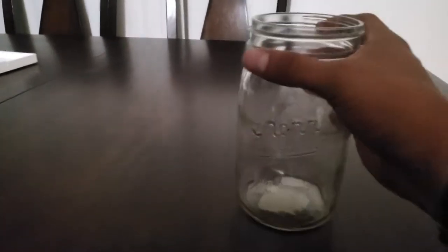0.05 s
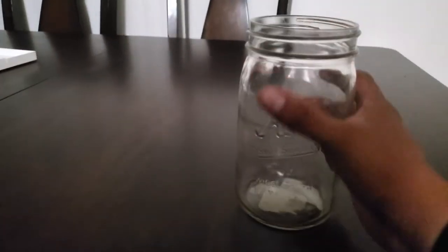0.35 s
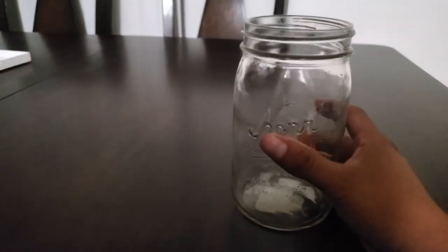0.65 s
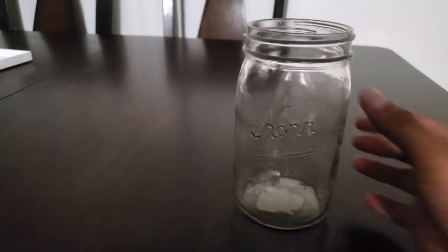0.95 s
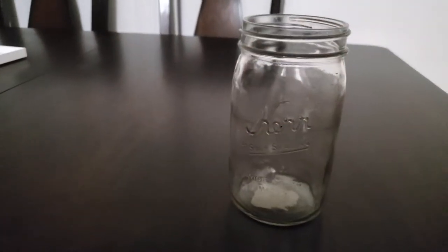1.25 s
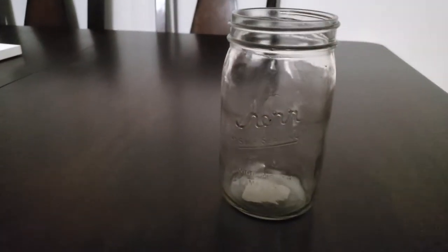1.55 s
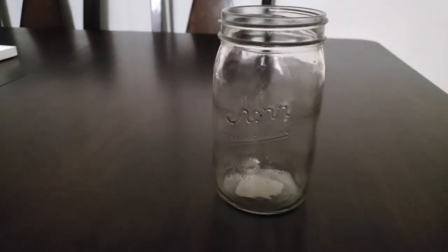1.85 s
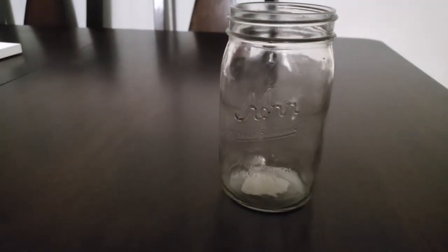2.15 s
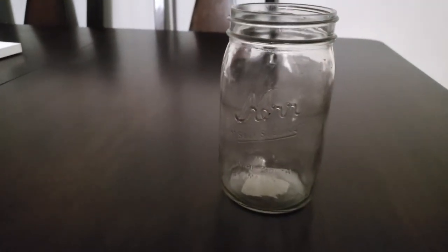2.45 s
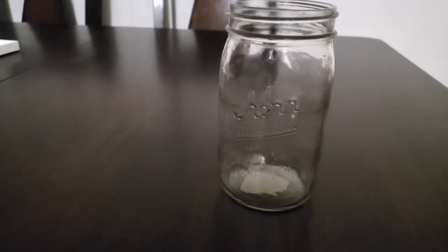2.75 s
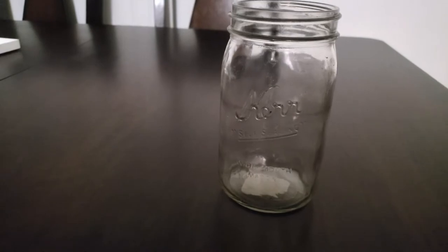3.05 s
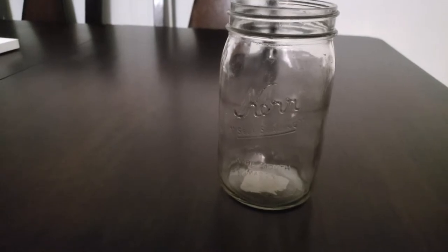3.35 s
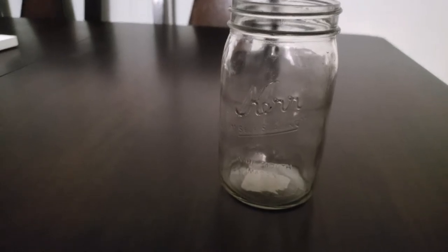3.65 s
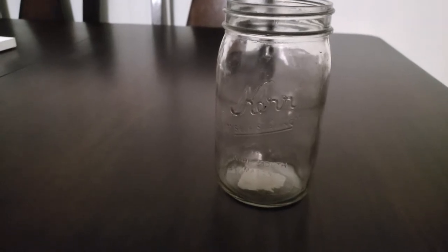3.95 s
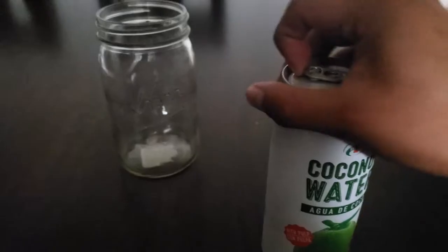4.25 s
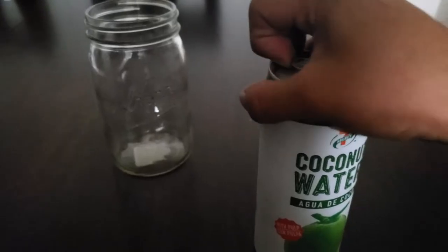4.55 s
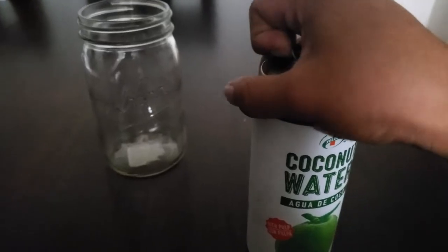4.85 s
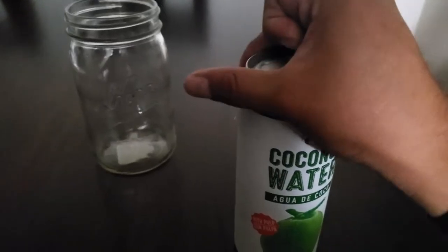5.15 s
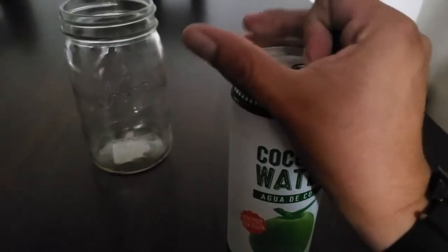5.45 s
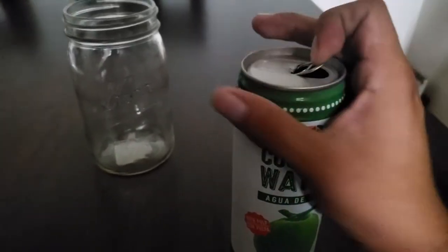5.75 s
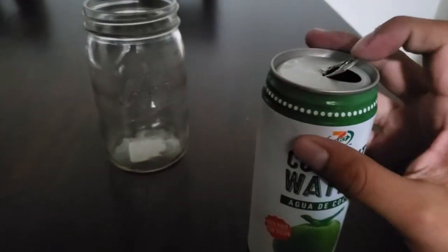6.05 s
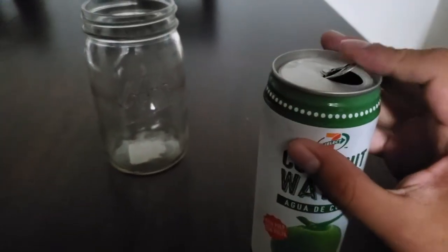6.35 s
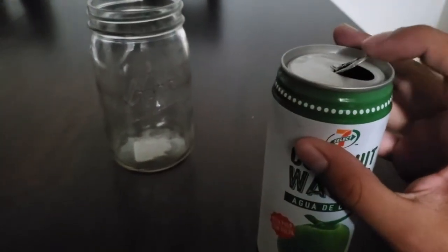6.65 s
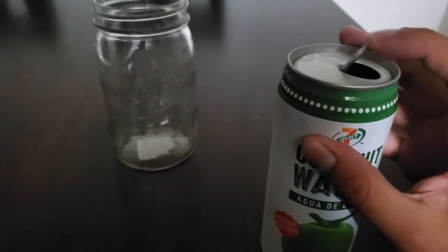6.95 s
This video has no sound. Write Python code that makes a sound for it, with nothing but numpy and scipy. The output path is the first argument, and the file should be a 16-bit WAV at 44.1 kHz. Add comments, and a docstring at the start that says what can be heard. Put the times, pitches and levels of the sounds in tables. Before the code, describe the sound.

An empty glass jar is set on a wooden table with two knocks, followed by a light clink as the hand lets go. For a few seconds there is only a faint fridge hum. Then a drink can is opened: a click, a short puff of gas, a loud crack and two sharp metallic snaps. Fingers softly scrape the tab. It all sounds close, in a room with a short echo.

```python
"""Over a faint fridge hum and a soft background rush, an empty glass jar knocks twice on a wooden table.
Skin brushes the glass and the jar clinks as the hand lets go. After a short silence a drink can is opened:
the tab clicks, gas puffs through the seal, the lid tears and snaps in, and the tab springs free.
Then fingers fiddle with the tab and the can rocks on the table. Each blow is a click and a tiny scrape
that make an object ring, and the hard walls of the room send it back."""
import sys
import numpy as np
from scipy import signal
from scipy.fft import rfft, irfft
from scipy.io import wavfile
from scipy.ndimage import uniform_filter1d, minimum_filter1d

SR = 44100
rng = np.random.default_rng(int(sys.argv[2]) if len(sys.argv) > 2 else 0)


def file_out(sig):
    """Save sig as 16-bit WAV at sys.argv[1]."""
    # one column per channel
    cols = np.atleast_2d(sig).T
    # limit, then scale
    lim = np.clip(cols, -1, 1)
    pcm = np.round(lim * 32767).astype(np.int16)
    wavfile.write(sys.argv[1], SR, pcm)


N = 313110
TIME = np.arange(N) / SR
FREQS = np.arange(N // 2 + 1) * SR / N


def undb(db):
    """Turns decibels into a gain to multiply by."""
    return 10 ** (np.asarray(db) / 20)

def over_pitch(rows, hz):
    """Joins rows of (frequency, value) into a curve, with every octave equally wide."""
    points, values = np.transpose(rows)
    return np.interp(np.log(hz + 1), np.log(points), values)

def unit(x):
    """Scales to an energy of one."""
    return x / np.sqrt(np.sum(x ** 2))

def add(track, s, x):
    """Mixes x into the track from time s."""
    start = int(s * SR)
    track[start:start + len(x)] += x[:N - start]

def ramp(start_s, length_s):
    """Rises evenly from zero to one."""
    return np.clip((TIME - start_s) / length_s, 0, 1)

def shortest_click(db):
    """The shortest sound that has these levels at evenly spaced frequencies."""
    cepstrum = irfft(db * np.log(10) / 20)
    half = len(cepstrum) // 2
    # folding onto the first half packs the energy at the start
    cepstrum[1:half] *= 2
    cepstrum[half + 1:] = 0
    return irfft(np.exp(rfft(cepstrum)))

def noise(gain):
    """Noise of strength one, shaped by a gain for each frequency."""
    return unit(irfft(gain * rfft(rng.standard_normal(N)), N)) * np.sqrt(N)

def waver(rate_hz):
    """Smooth random wandering with a spread of one."""
    return noise(1 / (1 + (FREQS / rate_hz) ** 4))

def noise_all_around(gain, mic_spacing_m=0.14):
    """Noise from all sides: long waves reach both microphones alike."""
    alike = np.sinc(2 * FREQS * mic_spacing_m / 343) * .95
    mid = irfft(gain * np.sqrt(1 + alike) * rfft(rng.standard_normal(N)), N)
    side = irfft(gain * np.sqrt(1 - alike) * rfft(rng.standard_normal(N)), N)
    return unit(np.array([mid + side, mid - side])) * np.sqrt(2 * N)

def place(x, lag_s, pan_db):
    """A sound from one direction: the left side gets it lag_s later and pan_db louder."""
    left = irfft(rfft(x) * np.exp(-2j * np.pi * FREQS * lag_s), N)
    return np.array([left * undb(pan_db / 2), x * undb(-pan_db / 2)])

# How long the room rings; a ring time is the time to fade by 60 dB (frequency [Hz], ring time [s])
ROOM_RING = [(100, 0.92), (300, 0.26), (800, 0.36), (2500, 0.39), (6000, 0.35), (14000, 0.3)]
# Echoes off the nearest walls (delay [s], gain [ratio], extra delay on the left [s])
WALL_ECHOES = [(0.012, 0.12, 0.01), (0.019, 0.09, -0.0079), (0.041, 0.081, 0.017)]
def room(x, build_s=0.0014):
    """Hard walls return a few distinct echoes and a smooth tail whose bass lasts longest."""
    wash = noise_all_around(np.ones(len(FREQS)))[:, :SR]
    hz, t, cells = signal.stft(wash, SR, nperseg=256)
    ring_s = over_pitch(ROOM_RING, hz)[:, None]
    tail = signal.istft(cells * np.exp(-np.log(1000) * t / ring_s), SR)[1][:, :SR]
    build_up = 1 - np.exp(-(TIME[:SR] / build_s) ** 2)
    tail = unit(tail * build_up) * np.sqrt(2)
    for delay, gain, lag in WALL_ECHOES:
        tail[0, int((delay + lag) * SR)] += gain
        tail[1, int(delay * SR)] += gain
    return signal.fftconvolve(x[None], tail, axes=1)[:, :N]

def body(colour, notes, size=32768):
    """An object's answer to a click: ringing notes stand above a quickly fading thud or tick."""
    hz = np.arange(size // 2 + 1) * SR / size
    # the longer a note rings, the narrower its peak
    peaks = sum(undb(db) ** 2 / (1 + ((hz - pitch) * 2 * np.pi * ring_s / np.log(1000)) ** 2)
                for pitch, db, ring_s in notes)
    return shortest_click(over_pitch(colour, hz) + 10 * np.log10(1 + peaks))

def strike(blows, response, lag_s, pan_db, size=4096):
    """Each blow is a click plus a scrape of tiny slips; it rings the object, which rings the room."""
    hz = np.arange(size // 2 + 1) * SR / size
    direct, to_room = np.zeros(N), np.zeros(N)
    for s, db, scrape_s, scrape_db, brightness, room_db in blows:
        slips = rng.standard_normal(size) * rng.exponential(size=size)
        force = undb(scrape_db) * unit(slips * np.exp(-(TIME[:size] / scrape_s) ** 4))
        force[0] += 1  # the click
        contact = shortest_click(brightness * np.log2(np.hypot(hz, 300)))  # harder is brighter
        sound = signal.fftconvolve(signal.fftconvolve(force, contact), response)
        sound = -undb(db) * unit(sound) * np.sqrt(SR / 100)  # level as if spread over 10 ms
        add(direct, s, sound)
        add(to_room, s, sound * undb(room_db))
    return place(direct, lag_s, pan_db) + room(to_room)


# The compressor's tones (multiple of its turning speed [number], relative level [dB])
HUM_TONES = [(1, -72.5), (2, -67), (3, -67), (4, -81.5), (5, -77), (6, -69.5), (7, -82), (8, -77),
             (10, -69), (11, -80.5), (12, -83.5), (41, -82)]
# The casing's whine (pitch [Hz], half width [Hz], relative level [dB])
CASING_WHINE = [(2432, 270, -85.5), (2584, 83, -79.5), (2870, 59.06, -83.5), (3757, 109, -84),
                (4050, 430, -82), (5040, 200, -88)]
# The fridge before and after the phone moves (hum [dB], whine [dB], left over right [dB], left delay [s])
FRIDGE_SPOTS = [(2.03, 1, -3.5, .00035), (0.41, -2, -3, .00025)]
def fridge(turns_hz=58.66, drift=0.00027, waver_db=3, wander_db=0.4, move_s=4.2):
    """The compressor hums and the casing whines; both are fainter once the phone has moved."""
    turns = np.cumsum(turns_hz * (1 + drift * waver(1.3))) / SR
    hum = 0
    for multiple, db in HUM_TONES:
        swell = undb(db + waver_db * waver(0.91) / np.hypot(1, multiple / 5))  # low tones waver most
        hum = hum + swell * np.sqrt(2) * np.sin(2 * np.pi * (round(multiple) * turns + rng.random()))
    whine = sum(undb(db) * noise_all_around(1 / (1 + ((FREQS - hz) / width) ** 2))
                for hz, width, db in CASING_WHINE)
    before, after = (undb(hum_db) * place(hum, lag_s, pan_db) + undb(whine_db) * whine
                     for hum_db, whine_db, pan_db, lag_s in FRIDGE_SPOTS)
    return np.where(TIME < move_s, before, after) * undb(wander_db * waver(.8))

# Tone colour of the background: a dull rush and a faint, high hiss (frequency [Hz], relative level [dB])
BACKGROUND_COLOUR = [(25, -2.5), (55, 3), (90, -5.5), (180, -0.5), (300, -7.5), (500, -11.5), (720, -13),
                     (950, -26.5), (1600, -24.5), (2000, -29.5), (4500, -31), (7000, -42), (10000, -41),
                     (15000, -33.5)]
def background(level_db=-62, waver_db=.4, pan_db=-1.5):
    """The dull, nearly steady rush of the room, with a faint, high hiss on top."""
    swell = undb(level_db + waver_db * waver(1.5))
    rush = noise_all_around(undb(over_pitch(BACKGROUND_COLOUR, FREQS))) * swell
    return rush * undb(np.array([[pan_db], [-pan_db]]) / 2)

# Two knocks of the jar, then three soft ones of the can
# (time [s], level [dB], scrape length [s], scrape over click [dB], brightness [dB/octave], echo [dB])
KNOCKS = [(.0612, -10, 0.036, -11.5, 1.5, 2), (.2595, -19, 0.007, 2, 1.5, 1.5),
          (4.28, -42.5, 0.029, 2, 0, -3.5), (4.883, -42.5, .008, -2, -7, 6),
          (6.301, -41.5, .016, -2, -5, 3.5)]
# Tone colour of the wood's thud (frequency [Hz], relative level [dB])
WOOD_COLOUR = [(35, -31.5), (75, -12), (150, -9), (250, -2.5), (400, 0), (650, -6.5), (1000, -11),
               (1400, -20.5), (2200, -25.5), (4000, -40), (7000, -55), (11000, -56), (16000, -72.5)]
# The table's ringing notes (pitch [Hz], height above the colour [dB], ring time [s])
WOOD_NOTES = [(70.95, 10.5, 0.3), (122.3, 9, 0.23), (185.6, 10.5, 0.21), (237.6, 3, 0.6), (289, 11.5, 0.23),
              (389, 6.5, 0.29), (422, 6, 0.17), (467, 3.5, 0.1), (518.7, 1.5, 0.14), (614, 6.5, 0.22),
              (817.7, 6, 0.18), (1029, 4.5, .2)]
def table_knocks():
    """The wooden table top booms under the jar and the can."""
    return strike(KNOCKS, body(WOOD_COLOUR, WOOD_NOTES), lag_s=.00013, pan_db=0.74)

# Swishes of the hand (time of the peak [s], level [dB])
SWISHES = [(.49, -67), (.89, -75), (1.96, -74), (4.55, -72), (5.75, -76)]
# Tone colour of sliding skin (frequency [Hz], relative level [dB])
SKIN_COLOUR = [(500, -10), (2000, -3), (4500, -2), (8000, -8), (15000, -13)]
def hand_swishes(half_length_s=0.076):
    """Skin brushes glass and metal; each faint swish swells and fades at the same pace."""
    swell = sum(undb(db) * np.exp(-((TIME - s) / half_length_s) ** 2) for s, db in SWISHES)
    return swell * noise_all_around(undb(over_pitch(SKIN_COLOUR, FREQS)))

# The touch as the hand lets go
# (time [s], level [dB], scrape length [s], scrape over click [dB], brightness [dB/octave], echo [dB])
CLINKS = [(.5291, -33, 0.0055, 3.4, 0.062, 1.13)]
# Tone colour of the glass's tick (frequency [Hz], relative level [dB])
GLASS_COLOUR = [(200, -15), (1200, -13), (2000, -3), (2800, 0), (3800, -9), (5200, -11), (6400, -20),
                (8800, -35), (10300, -24), (16000, -29)]
# The jar's ringing notes (pitch [Hz], height above the colour [dB], ring time [s])
GLASS_NOTES = [(2552, 3, .06), (2790, 3, .06), (3176, 5, .06), (4194, 3, .06), (5216, 3, .04),
               (10300, 6, .01)]
def jar_clink():
    """The glass wall gives one short, bright ring."""
    return strike(CLINKS, body(GLASS_COLOUR, GLASS_NOTES), lag_s=.00025, pan_db=1.6)

# The tab clicks, the seal cracks, the lid tears
# (time [s], level [dB], scrape length [s], scrape over click [dB], brightness [dB/octave], echo [dB])
CRACKS = [(4.504, -63, 0.0022, 5, 1.29, 3), (4.7192, -27, 0.0027, -2, 2.4, -4),
          (4.9942, -9, 0.0032, 5, 0.75, -1)]
# Tone colour of the lid's metal (frequency [Hz], relative level [dB])
LID_COLOUR = [(100, -14.5), (700, -10.5), (1200, -5.5), (1800, -1.5), (2600, 0.5), (4800, 0.5), (7000, -3),
              (9500, -5.5), (16000, -14)]
# The tight lid's ringing notes (pitch [Hz], height above the colour [dB], ring time [s])
LID_NOTES = [(1760, 9.2, .012), (2830, 9.3, 0.023), (3880, 8.9, 0.031), (3950, 10.42, 0.022),
             (4240, 13, 0.024), (6420, 7.3, 0.022), (7326, 8, 0.022)]
def lid_cracks():
    """The tight lid gives high cracks as the tab is lifted."""
    return strike(CRACKS, body(LID_COLOUR, LID_NOTES), lag_s=0.00014, pan_db=1.5)

# Tone colour of the escaping gas (frequency [Hz], relative level [dB])
GAS_COLOUR = [(100, -9.5), (800, -20), (1200, -10.5), (1800, 6), (2800, -6), (4000, -2), (5200, -9.5),
              (7000, -2.5), (9000, -7.5), (11500, -1), (16000, -7)]
def gas_puff(time_s=4.7578, level_db=-24, rise_s=.003, hold_s=.0115, fade_s=.035):
    """Gas sputters through the cracked seal, holds while the pressure lasts, then dies away."""
    sputter_db, room_db = 2, -4
    fading_for_s = np.maximum(TIME - time_s - hold_s, 0)
    flow = ramp(time_s - rise_s, rise_s) ** 2 * np.exp(-np.log(1000) * fading_for_s / fade_s)
    hiss = noise(undb(over_pitch(GAS_COLOUR, FREQS)))
    puff = hiss * undb(level_db + sputter_db * waver(600)) * flow
    return place(puff, lag_s=.00016, pan_db=.8) + undb(room_db) * room(puff)

# The lid snaps in
# (time [s], level [dB], scrape length [s], scrape over click [dB], brightness [dB/octave], echo [dB])
SNAPS = [(5.1006, -13, .001, -1, -.6, 1.5)]
# Tone colour of the open can (frequency [Hz], relative level [dB])
CAN_COLOUR = [(100, -5), (550, -6), (900, 2), (1500, -2), (2300, 8.5), (3300, -12.5), (6000, 1),
              (9000, -3.5), (11500, -2.5), (16000, -15)]
# The open can's ringing notes (pitch [Hz], height above the colour [dB], ring time [s])
CAN_NOTES = [(915, 15, .03), (1025, 11, .03), (2200, 7, .02), (2430, 10, .04), (3930, 8, .03),
             (6600, 6, .015), (8650, 7, .008)]
def lid_snap():
    """With the lid torn open, the hollow under it rings too."""
    return strike(SNAPS, body(CAN_COLOUR, CAN_NOTES), lag_s=0.00011, pan_db=-1.5)

# The tab's flick
# (time [s], level [dB], scrape length [s], scrape over click [dB], brightness [dB/octave], echo [dB])
FLICKS = [(5.1283, -12, .002, -1, 1, -3.5)]
# The flick's ringing notes (pitch [Hz], height above the colour [dB], ring time [s])
FLICK_NOTES = [(1008, 18.5, 0.012), (2355, 13, 0.017), (5880, 10.8, .008), (8760, 6, 0.0051)]
def tab_spring():
    """The tab springs free and rings briefly, with the tone colour of the lid."""
    return strike(FLICKS, body(LID_COLOUR, FLICK_NOTES), lag_s=.000136, pan_db=1)

# Fingers on the tab (time [s], level [dB], scrape length [s], brightness [dB/octave])
FINGER_TOUCHES = [(5.445, -62.5, .01, 1), (5.815, -63.5, .012, 4.5), (5.985, -64, 0.039, -4),
                  (6.09, -68, .03, -2), (6.19, -59, 0.036, 1.5), (6.276, -40.5, 0.018, -1.5),
                  (6.441, -53, .015, -2.5)]
# Tone colour of the scraped tab (frequency [Hz], relative level [dB])
TAB_COLOUR = [(100, -19), (700, -19), (1200, 0), (1900, -21), (3100, -11), (4200, -22), (5300, -22),
              (8000, -35), (16000, -50)]
# The tab's ringing notes (pitch [Hz], height above the colour [dB], ring time [s])
TAB_NOTES = [(1114, 12, 0.042), (1288, 11.6, 0.053), (2970, 2.5, 0.041)]
def tab_fiddling(as_strong_as_click_s=.003, room_db=-3):
    """Fingers scrape the tab: the longer one slides, the more its tiny slips outweigh the click."""
    scrapes = [(s, db, length_s, 10 * np.log10(length_s / as_strong_as_click_s), brightness, room_db)
               for s, db, length_s, brightness in FINGER_TOUCHES]
    return strike(scrapes, body(TAB_COLOUR, TAB_NOTES), lag_s=.00018, pan_db=-2.0)


def scene():
    """Jar, can and hand over the fridge and the background."""
    table_and_jar = table_knocks() + jar_clink()
    can = lid_cracks() + lid_snap() + tab_spring() + tab_fiddling() + gas_puff()
    return table_and_jar + can + hand_swishes() + fridge() + background()

def limiter(x, ceiling=.9, recover_db_per_s=120, size=129):
    """Turns the level down just ahead of each too-loud peak, then lets it come back gradually."""
    over_db = 20 * np.log10(np.maximum(np.abs(x).max(axis=0) / ceiling, 1))
    ahead_db = -minimum_filter1d(-over_db, size)
    recovery_db = recover_db_per_s * TIME
    cut_db = np.maximum.accumulate(ahead_db + recovery_db) - recovery_db
    return x * undb(-uniform_filter1d(cut_db, size))

# The level dips for a pause between jar and can, and briefly before the snap
# (time [s], length [s], depth [dB], fall [s], rise [s])
LEVEL_DIPS = [(4.14, 0.16, -52, 0.0091, .036), (5.089, .0112, -17.5, 0.0071, 0.0033)]
def record(dry, bottom_hz=35, top_hz=16200):
    """The level dips twice; the phone cuts the rumble, limits the peaks and cuts the highest treble."""
    dip_db = sum(db * (ramp(s, fall) - ramp(s + length - rise, rise))
                 for s, length, db, fall, rise in LEVEL_DIPS)
    rumble_cut = signal.butter(2, bottom_hz, "high", fs=SR, output="sos")
    treble_cut = signal.ellip(10, .2, 80, top_hz, fs=SR, output="sos")
    x = signal.sosfilt(rumble_cut, dry * undb(dip_db))
    return signal.sosfilt(treble_cut, limiter(x))


dry = scene()
out = record(dry)
file_out(out)
```